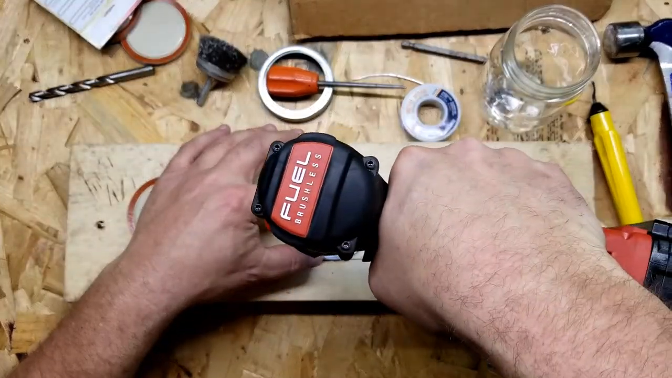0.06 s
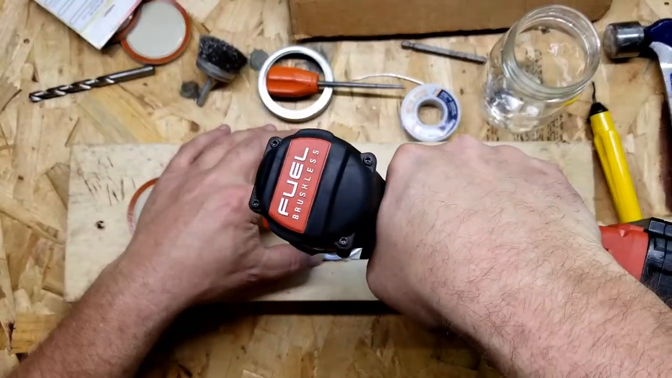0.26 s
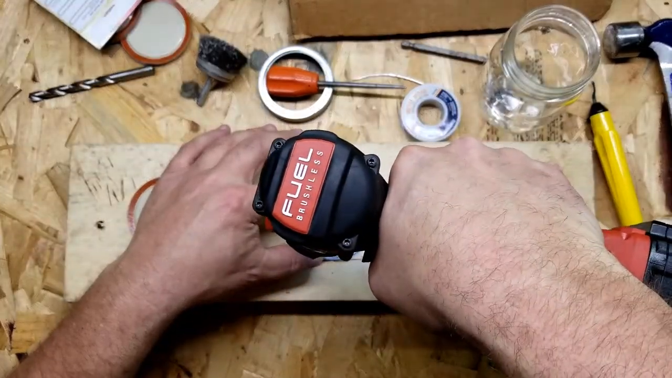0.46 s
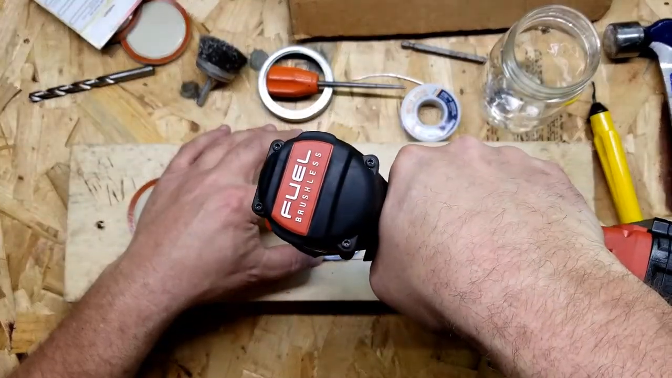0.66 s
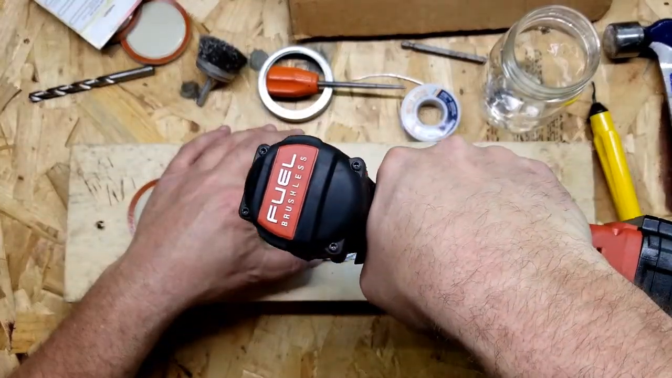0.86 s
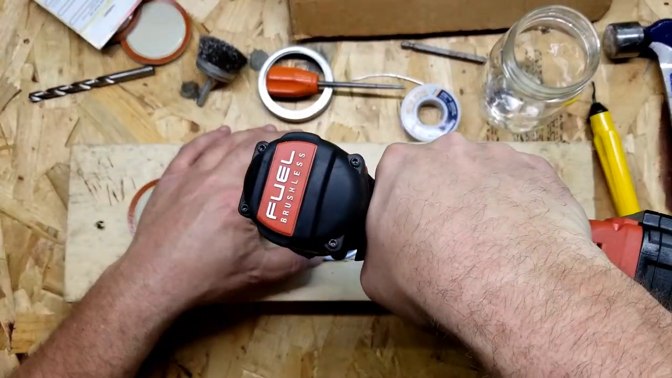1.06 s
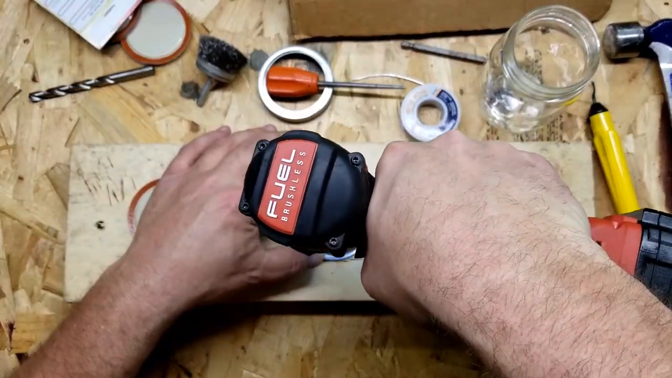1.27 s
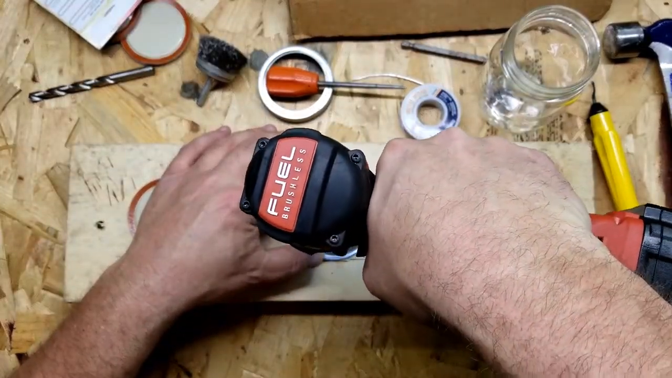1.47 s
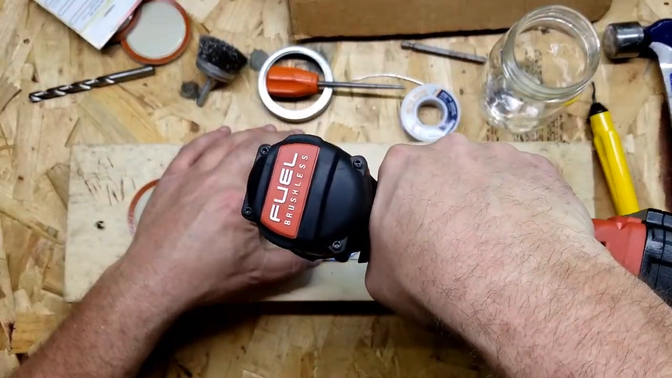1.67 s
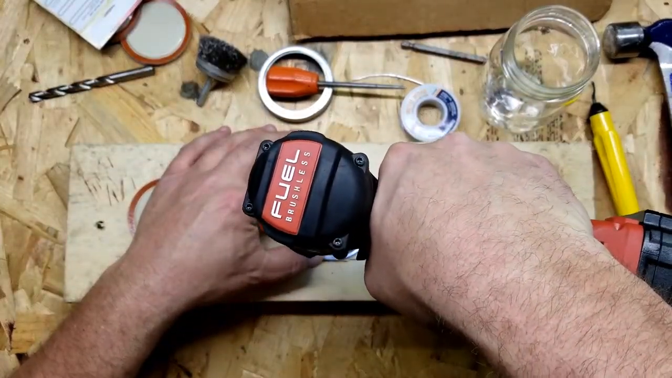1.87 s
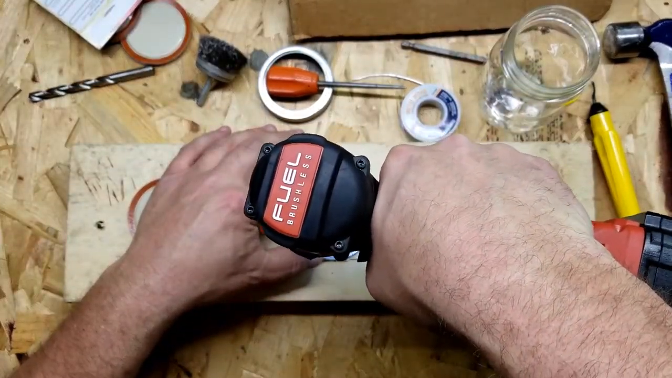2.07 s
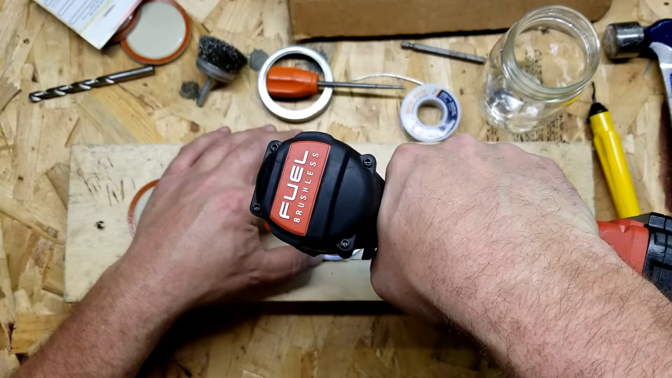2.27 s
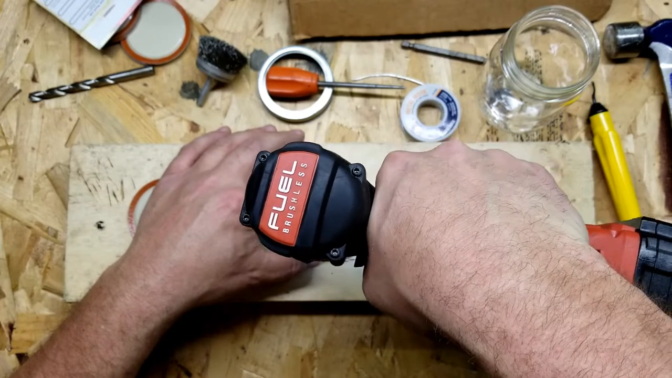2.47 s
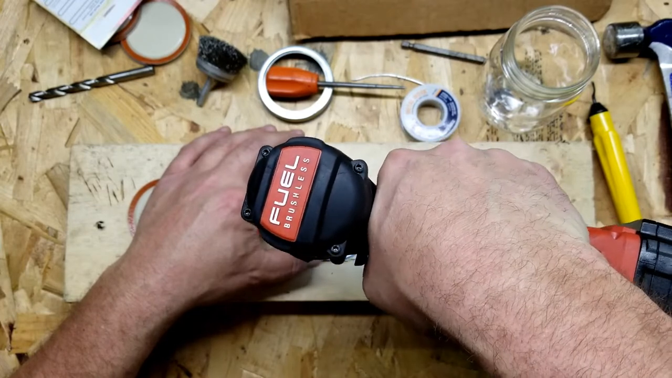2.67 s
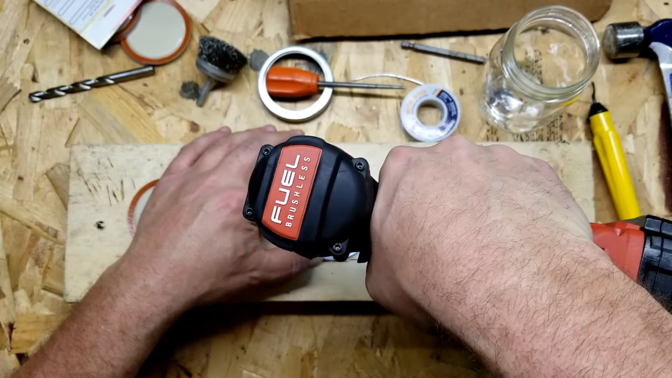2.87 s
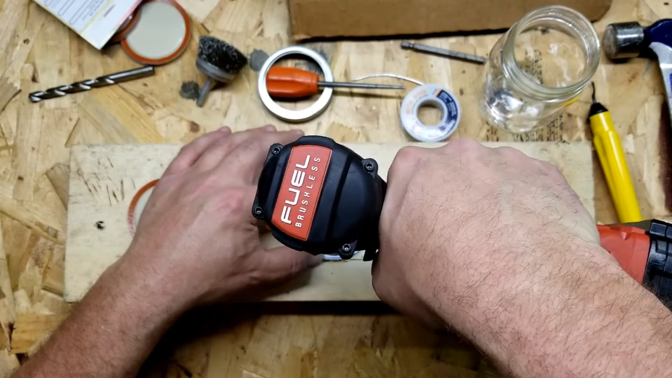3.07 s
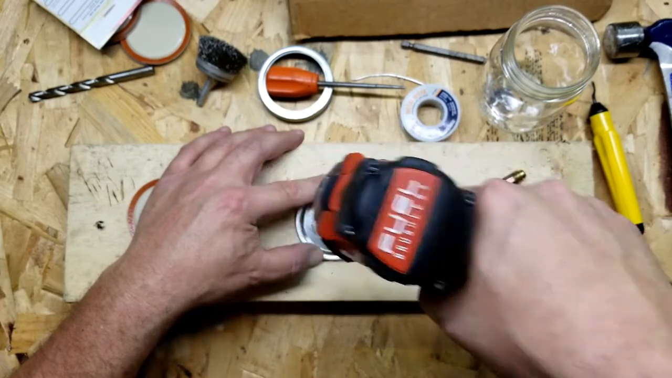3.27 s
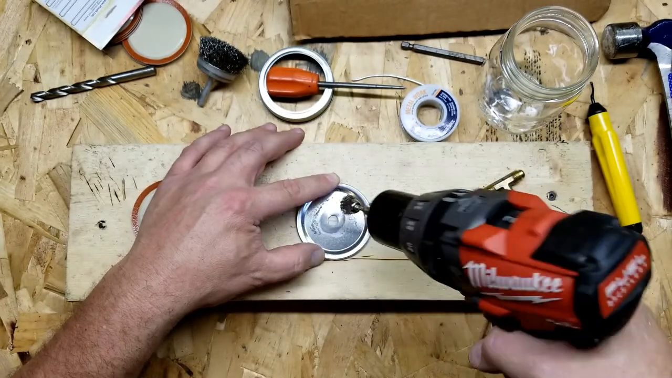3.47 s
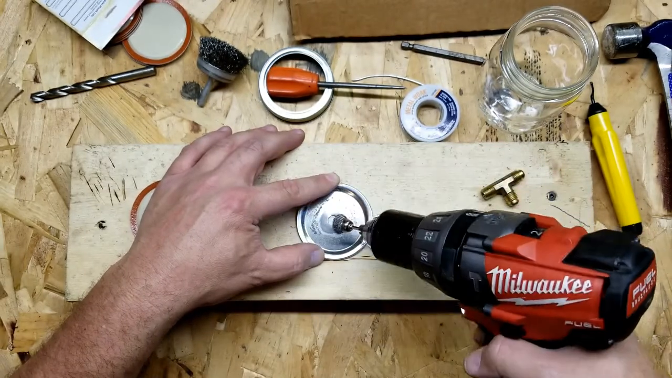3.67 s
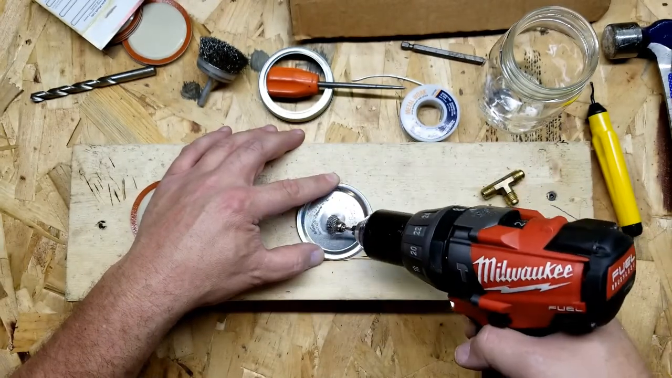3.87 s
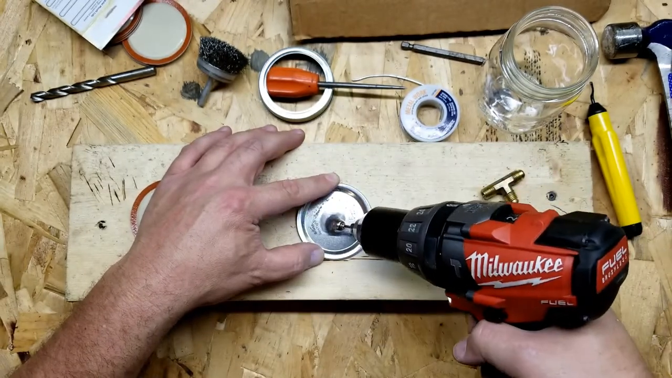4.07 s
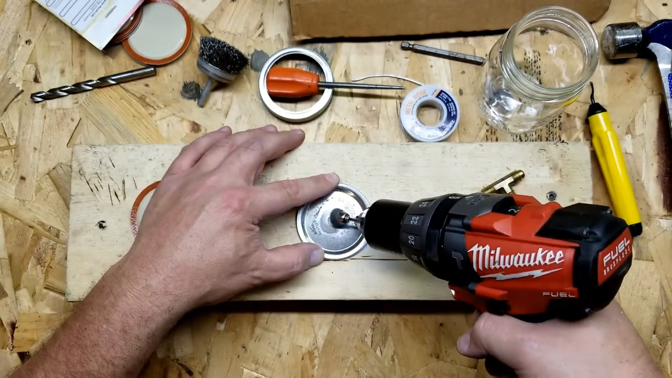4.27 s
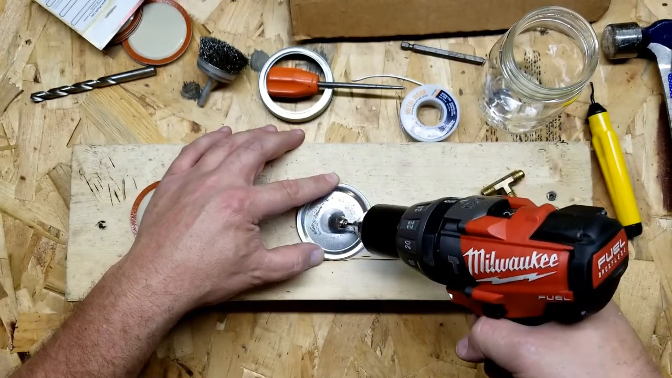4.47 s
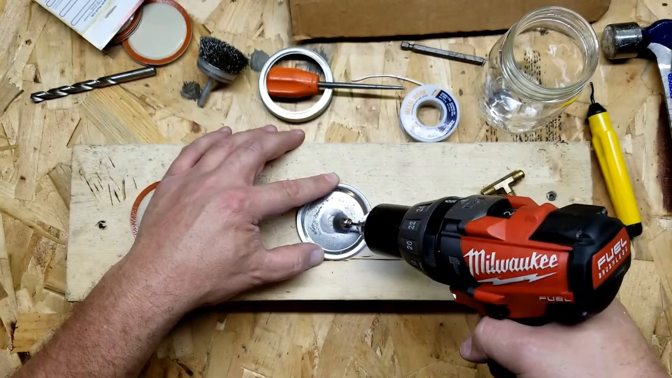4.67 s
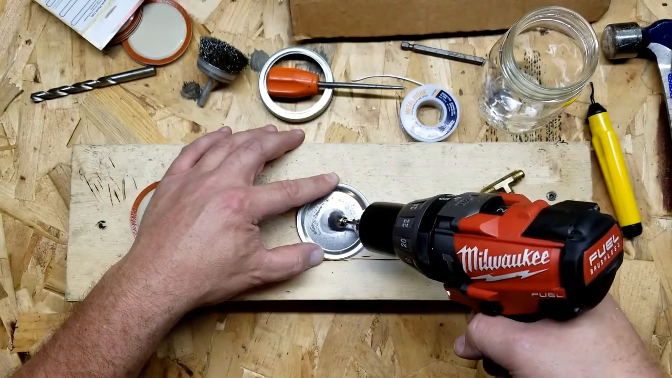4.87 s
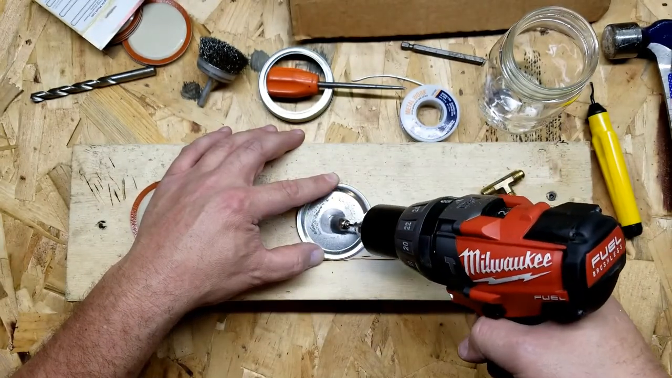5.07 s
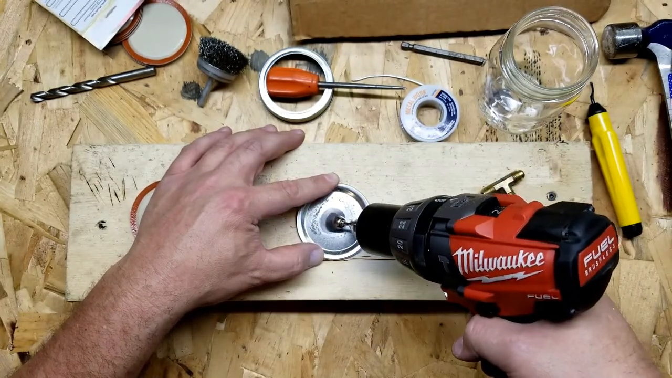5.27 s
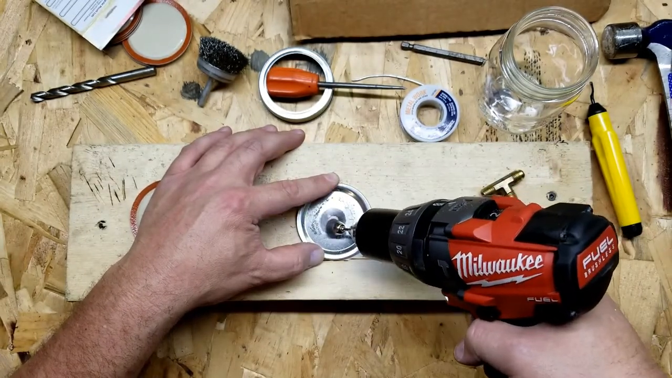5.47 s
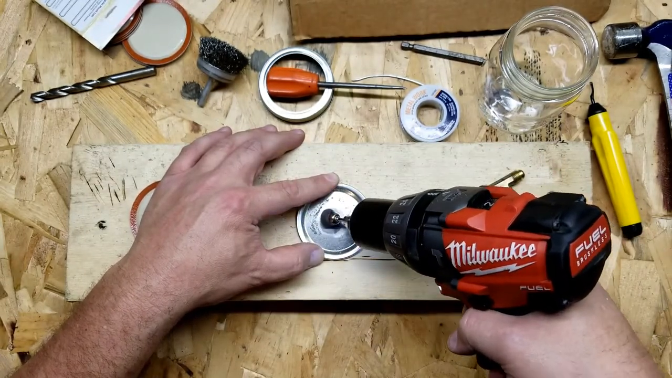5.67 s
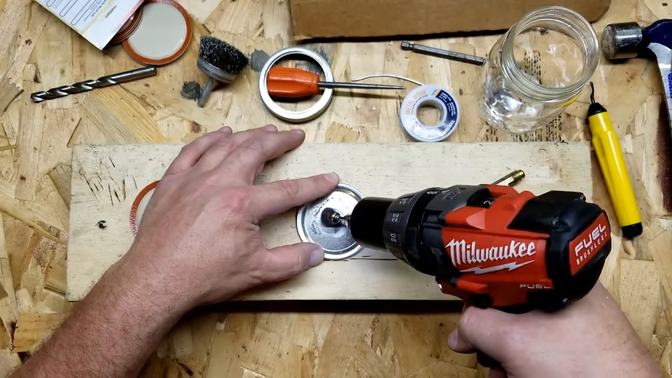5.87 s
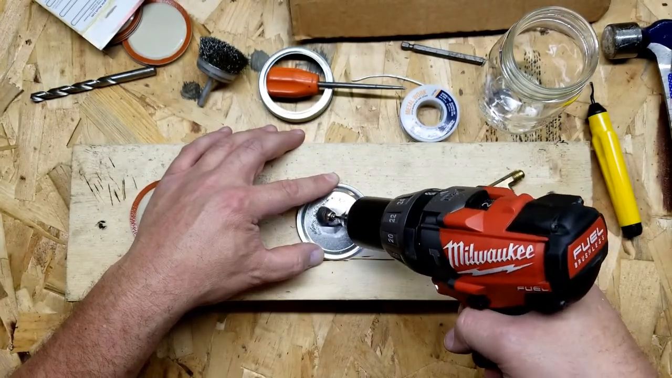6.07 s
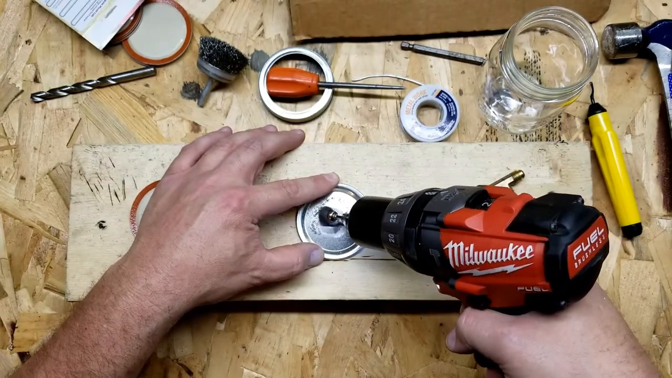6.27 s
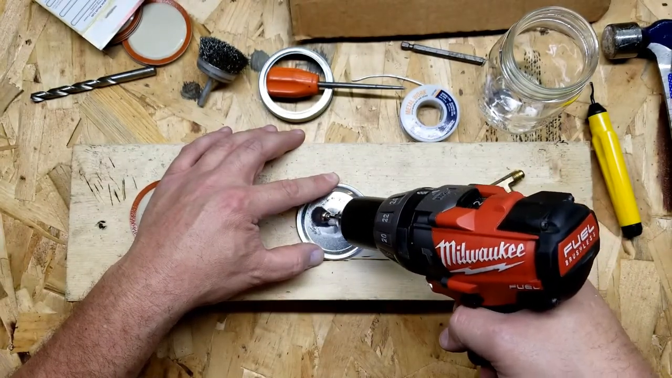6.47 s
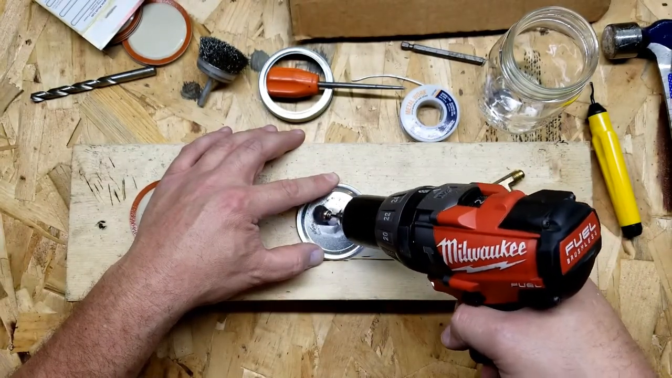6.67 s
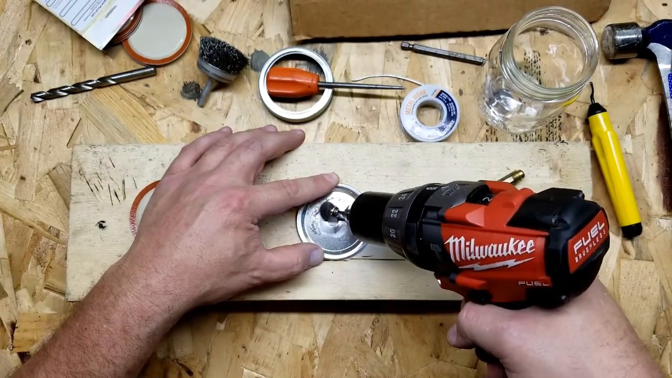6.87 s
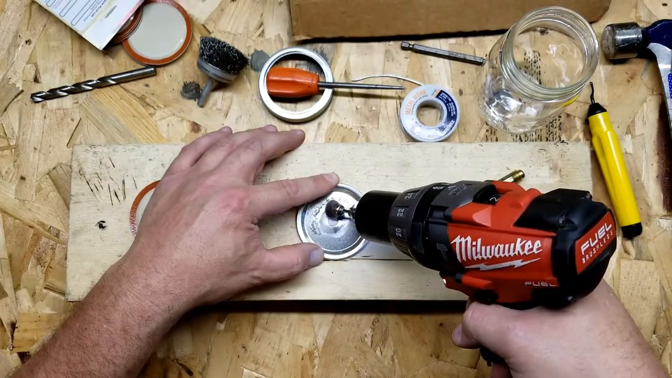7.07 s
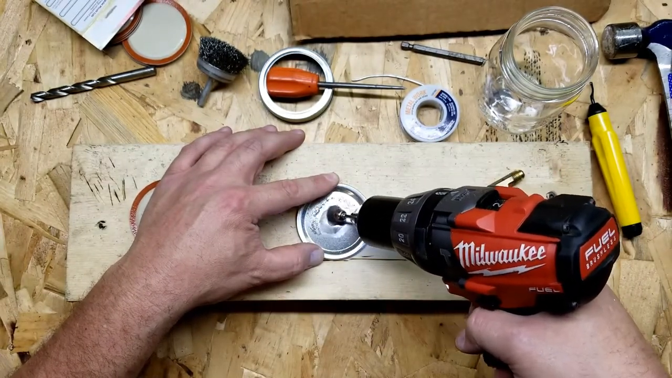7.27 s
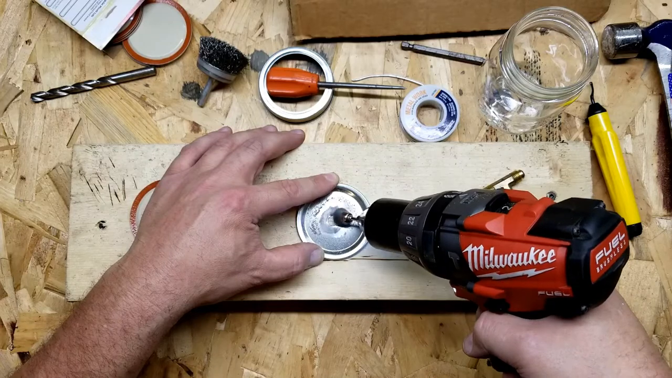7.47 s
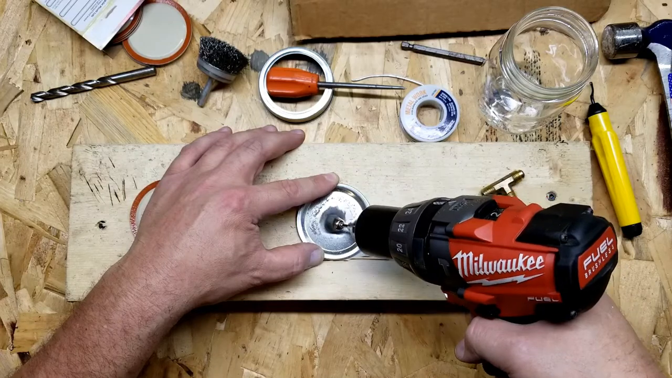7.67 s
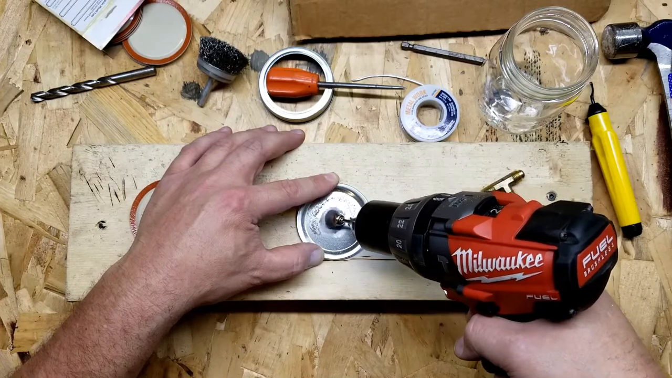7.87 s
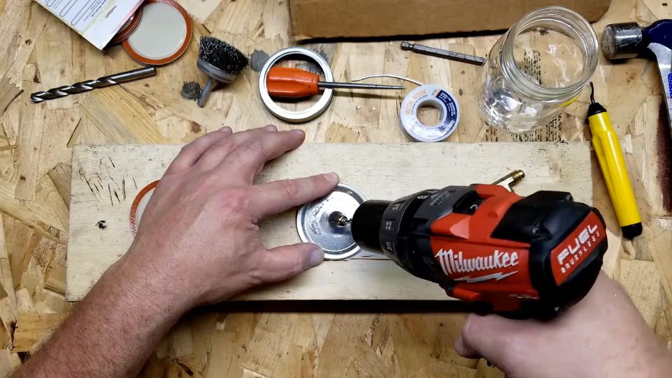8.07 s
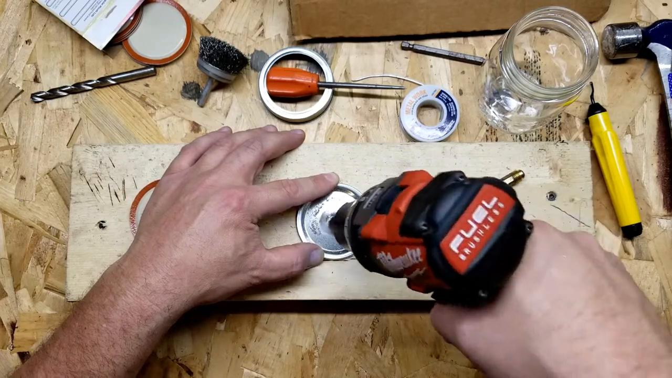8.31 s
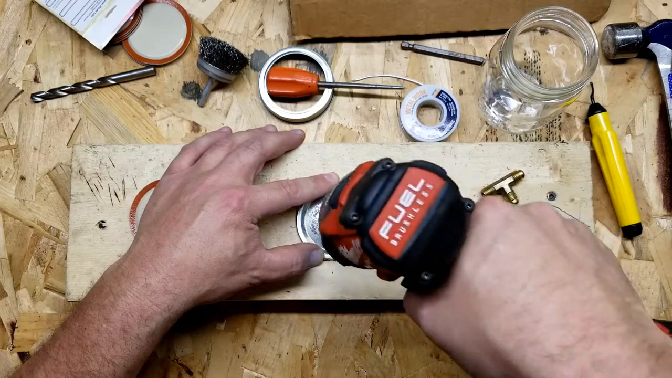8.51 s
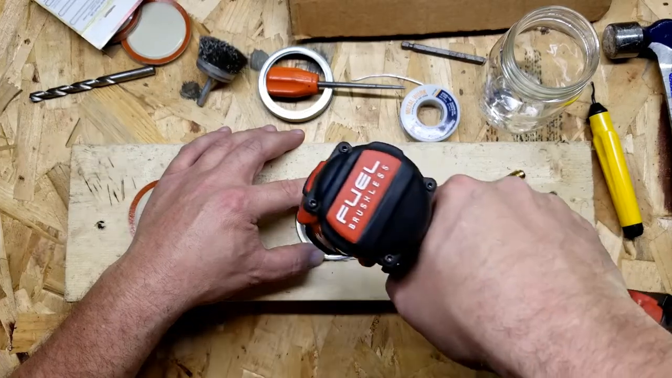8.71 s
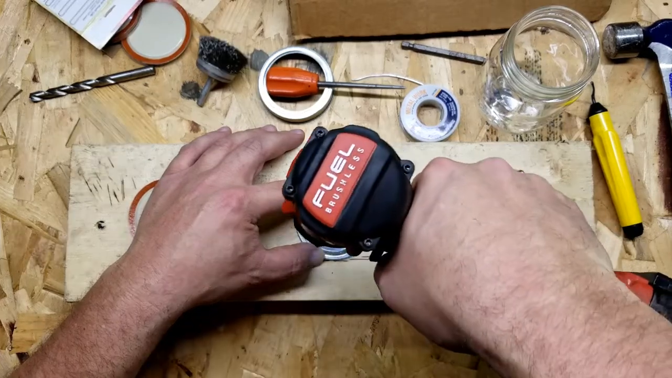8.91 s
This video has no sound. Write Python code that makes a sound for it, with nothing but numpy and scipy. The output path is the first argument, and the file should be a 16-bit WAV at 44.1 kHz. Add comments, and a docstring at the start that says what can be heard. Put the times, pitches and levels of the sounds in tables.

```python
"""A cordless drill spins a wire brush on a steel lid on a wooden bench, close to a pair of microphones.
In five stretches, gear tones and switching whine follow the motor speed over noise shaped as whirr and hiss;
the lid rings under bristle ticks and the bench hums at a resonance. Trigger clicks are damped plastic modes.
The second stretch is time-lapse: the drill played back about five times as fast and high, its speeds given
as played back. A short silence precedes it, a dip ends it; room tail and quiet background follow the dip."""
import sys
import numpy as np
from scipy import signal
from scipy.io import wavfile
from scipy.ndimage import uniform_filter1d

SR = 44100
rng = np.random.default_rng(int(sys.argv[2]) if len(sys.argv) > 2 else 0)


def master_out(mix):
    """Clip the mix to full scale and print it as 16-bit PCM to the path in sys.argv[1]."""
    frames = np.transpose(np.atleast_2d(mix))
    ceiling = np.clip(frames, -1, 1)
    pcm = np.round(ceiling * 32767).astype(np.int16)
    wavfile.write(sys.argv[1], SR, pcm)


N = 394342

# The drill's stretches. Each row: start and end in seconds, whirr level in dB, hiss in dB against the whirr,
# bench thrum in dB, attack in seconds, brake thump in dB. Pressure and speed move the levels.
STRETCHES = [(0, .735, -43, 3, -61, 0.00038, 3), (.79, 2.735, -52.5, 25, -59, 0.0037, 2),
             (2.75, 3.23, -35.5, 0, -53.5, 0.011, 3.5), (3.89, 8.1, -36, 4, -58, 0.013, 1),
             (8.578, 8.942, -38.5, 3.5, -68, 0.012, 0)]
# How alike the two microphones hear a sound. Each row: frequency in Hz, left-right likeness from 0 to 1.
LIKENESS = [(60, 0.91), (250, 0.91), (500, 1), (1000, 0.68), (2500, 1), (6000, 0.2), (15000, 0.48)]


def amp(db):
    """Amplitude factor of a level in dB."""
    return 10 ** (np.asarray(db) / 20)


def evened(x):
    """The signal scaled to rms 1."""
    return x / np.sqrt(np.mean(x ** 2) + 1e-20)


def read(points, hz):
    """Value of a spectrum at hz, on a log-frequency axis."""
    f, value = np.transpose(points)
    return np.interp(np.log(hz + 1), np.log(f + 1), value)


def add(mix, at, sound):
    """Lays a sound into the mix from sample at, cut off at the end of the mix."""
    part = mix[..., at:at + sound.shape[-1]]
    part += sound[..., :part.shape[-1]]


def ring(x, hz, width):
    """A fixed resonance, with a gain of about 1 at its peak and a width in Hz."""
    pole = np.exp((2j * np.pi * hz - np.pi * width) / SR)
    return 2 * signal.lfilter([1 - abs(pole)], [1, -pole], x).real


def wander(n, rate_hz):
    """Slow random drift of rms 1."""
    width = int(SR / rate_hz)
    return evened(uniform_filter1d(uniform_filter1d(rng.standard_normal(n), width), width))


def noise(n, colour, same, patchy_db, flicker_db):
    """Two channels of random short-time spectra with drifting patches and a shared flicker."""
    frames, hz = n // 256 + 5, np.fft.rfftfreq(1024, 1 / SR)
    a, b, c, d, patches = rng.standard_normal((frames, 513, 5)).T
    patches = evened(uniform_filter1d(uniform_filter1d(patches, 10, 0), 10, 1))
    left = a + 1j * b
    same = np.clip(same(hz), 0, 1)[:, None]
    right = same * left + np.sqrt(1 - same ** 2) * (c + 1j * d)
    z = np.array([left, right])
    z *= amp(colour(hz)[:, None] + patchy_db * patches + flicker_db * rng.standard_normal(frames))
    return signal.istft(z, nperseg=1024, noverlap=768)[1][:, :n]


def placed(pair, lag, pan_db):
    """The left microphone hears the sound lag samples later (earlier if negative) and pan_db louder."""
    return np.array([np.roll(pair[0], round(lag)) * amp(pan_db / 2), pair[1] * amp(-pan_db / 2)])


def wavering(turns):
    """A tone of about rms 1 whose level and phase drift a little, from its phase in turns."""
    level = amp(2.22 * wander(len(turns), 18))  # drift in dB
    drift = 0.19 * wander(len(turns), 30)  # radians
    return level * np.sqrt(2) * np.sin(2 * np.pi * (turns + rng.random()) + drift)


def quiet():
    """Background noise of the place, a steady two-channel spectrum."""
    # Each row: frequency in Hz, relative level in dB per Hz.
    quiet_colour = [(15, -62.5), (25, -19), (80, -7), (153, -34.5), (185, -18.5), (863, -25.5), (2000, -25),
                    (14000, -34), (16000, -42.5)]
    sound = noise(N, lambda hz: read(quiet_colour, hz), lambda hz: read(LIKENESS, hz), 2.0, 1.1)
    return amp(-72.5) * evened(sound)


def linger():
    """A faint narrow band of noise that swells and fades in the first pause; gives its start sample too."""
    start_s, length_s = 3.2, .58
    hz, width_hz, level_db = 1340, 155, -70
    shape = signal.windows.tukey(round(length_s * SR), .5)
    band = ring(ring(rng.standard_normal(SR), hz, width_hz), hz, width_hz)
    return round(start_s * SR), amp(level_db) * shape * evened(band)[:len(shape)]


def shop(x):
    """Sparse room taps of random sign, each band dying at its own speed, as alike left and right as its pitch."""
    # Each row: frequency in Hz, time to die by 60 dB in seconds.
    decay = [(125, 0.39), (500, 0.42), (1500, 0.51), (3000, 0.49), (6000, 0.54), (12000, 0.48)]
    taps = np.zeros((2, SR))
    at = np.arange(300, SR - 20, 20) + rng.integers(0, 20, (2, (SR - 301) // 20))
    np.put_along_axis(taps, at, rng.choice([-1., 1.], at.shape), 1)
    hz, t, z = signal.stft(taps, SR, nperseg=512)
    same = np.clip(read(LIKENESS, hz), 0, 1)[:, None] ** 2
    z[1] = same * z[0] + np.sqrt(1 - same ** 2) * z[1]
    fade = amp(-60 * t / read(decay, hz)[:, None])
    tail = signal.istft(z * fade, SR, nperseg=512)[1]
    return signal.fftconvolve(x, tail / np.linalg.norm(tail[0]), axes=1)[:, :N]


def clicks():
    """Plastic snaps: a short clatter with a weaker rebound rings the damped modes, over a low knock."""
    # Each row: start in seconds, snap peak in dB, knock in dB against the snap, left-right dB, rise in seconds.
    trigger_clicks = [(3.9, -31.5, -35, -7, 0.0011), (8.185, -38.5, -33, -8.5, 0.0076),
                      (8.39, -18, -30, -5.5, 0.003), (8.444, -18, -26.5, 4.5, 0.00044)]
    # Damped plastic modes. Each row: frequency in Hz, width in Hz, level in dB.
    plastic_modes = [(1240, 380, -10), (2340, 1360, 1.5), (4280, 250, 0), (5140, 480, 4),
                     (11000, 4000, -17)]
    out, t = np.zeros((2, N)), np.arange(4000) / SR
    for start_s, peak_db, knock_db, pan_db, rise_s in trigger_clicks:
        blow = amp(-60 * t / 0.016) + 0.16 * amp(-60 * t / 0.2)
        rebound = 0.16 * np.pad(blow, (330, 0))[:len(t)]
        blow = (blow + rebound) * np.minimum(t / rise_s, 1)
        snap = 0
        for hz, width_hz, db in plastic_modes:
            snap = snap + amp(db) * evened(ring(blow * rng.standard_normal(len(t)), hz, width_hz))
        knock = amp(knock_db - 60 * t / 0.03) * np.sin(2 * np.pi * 240 * t)
        snap = snap / abs(snap).max() + knock
        add(out, round(start_s * SR), amp(peak_db) * snap * amp([[pan_db / 2], [-pan_db / 2]]))
    return out


def lid():
    """Bristle tips tick on the steel in uneven clumps and ring its damped modes."""
    # Bristles bite the lid. Each row: start in seconds, length in seconds, level in dB.
    scrapes = [(0.117, 0.093, -28.5), (4.794, 0.16, -26), (5.506, 0.05, -17.5), (5.588, 0.11, -12.5),
               (5.669, 0.076, -11.5), (5.773, 0.069, -22.5), (5.934, 0.069, -22.5), (6.091, 0.028, -19),
               (6.127, 0.091, -15.5), (6.234, 0.051, -23.5), (7.606, 0.095, -23), (7.707, 0.17, -26.5),
               (7.808, 0.15, -23), (7.928, 0.073, -29)]
    # Modes of the steel. Each row: frequency in Hz, width in Hz, level in dB.
    lid_modes = [(1390, 190, -5.5), (4000, 270, -19), (5200, 180, -25), (5090, 50, 10), (5280, 690, 16),
                 (5470, 37, 2.5), (6520, 330, -13.5), (9700, 2200, 3)]
    bite = np.zeros(N)
    for start_s, length_s, db in scrapes:
        add(bite, round(start_s * SR), amp(db) * signal.windows.tukey(round(length_s * SR), .5))
    strength = amp(1.4 * np.minimum(rng.exponential(1, N), 4))
    ticks = strength * (rng.random(N) < 4000 / SR) * rng.choice([-1, 1], N)  # about 4000 a second
    ticks = bite * evened(ticks * amp(3 * wander(N, 150)))
    rung = []
    for hz, width_hz, db in lid_modes:
        evening = np.sqrt(SR / width_hz / (4 * np.pi))  # narrow modes would come out weaker
        rung.append(amp(db) * ring(ticks, hz, width_hz) * evening)
    # each mode radiates its own way: neighbours lean to opposite sides
    lean_db = [[1.5], [-1.5]] * np.cos(np.arange(len(lid_modes)) * np.pi)
    sides = amp(lean_db) @ np.array(rung)
    # a small lid radiates no bass
    sides = signal.sosfilt(signal.butter(2, 600, "high", fs=SR, output="sos"), sides)
    return placed(sides / np.linalg.norm(amp(np.transpose(lid_modes)[2])), 6.6, -5.0)


def bench(db, pace):
    """The board under the lid hums at one low resonance, raised by the playback pace, and comes and goes."""
    hz, width_hz = 141.4 * pace, 24 * pace
    flutter_db = 5.2 * wander(len(db), 9.7 * pace)
    hum = ring(ring(rng.standard_normal(len(db)), hz, width_hz), hz, width_hz)
    return amp(db + flutter_db) * evened(hum)


def whine(speed):
    """Switching tones with side tones that part from them as the motor speeds up."""
    switch_hz, slow_db = 4927.5, -53
    # Side tones, in orders of the motor speed from twice the switching rate.
    side_orders = [-8, -4, 0, 4, 8, 10, 14, 16]
    # Level of each side tone in dB, before the whine gain of the stretch.
    side_levels = [-63, -51, -61, -50, -55, -59, -60, -60]
    base, turns = switch_hz * np.arange(len(speed)) / SR, np.cumsum(speed) / SR
    out = 0
    for order, db in zip(side_orders, side_levels):
        out = out + amp(db) * wavering(2 * base + order * turns)
    # odd multiples are heard only while the motor turns slowly
    return out + amp(slow_db) * np.exp(-(speed / 90) ** 2) * (wavering(base) + wavering(3 * base))


def gears(index, speed, pace):
    """Orders of the motor speed, lifted as they pass the housing resonance; lash rattles as a low speed rises."""
    # Multiples of the motor speed as played back.
    gear_orders = [2, 4, 6, 8, 10, 12, 13, 16, 20, 22]
    # One row a stretch: level of each order in dB against the whirr.
    gear_levels = [(-26, -12.5, -15, -25, -17, -24, -.5, 8, 3, -25),
                   (-38, 11, -7, -20, 7, 0, -35, -35, -35, -35),
                   (-27, -7, -13, -9, -20, -14, -7, -4, -14, -25),
                   (-23, -18, -15, -26, -18, -20, -13, -9, -20, -15),
                   (-28, -14, -30, -25, -20, -26, -7, 2, -6, -25)]
    housing_hz, housing_width_hz, lift_db = 2900, 600, 9
    wobble, wobble_hz = .0003, 40  # random share of the speed and its rate, both raised by the pace
    shudder = .016  # share added per 1000 turns per s2
    torque_db = 3.5  # gears sing louder while the speed changes: gain at 1000 turns per s2 and above
    rattle_hz, rattle_width_hz, rattle_db = 2830, 150, 7  # against the whirr at 1000 turns per s2
    lash = .04  # rattle left at steady speed, in 1000 turns per s2

    # speed change in 1000 turns per s2, brought back from the playback pace
    change = uniform_filter1d(np.gradient(speed) * SR / 1000, 1500) / pace ** 2
    waver = (wobble * pace + shudder * abs(change)) * wander(len(speed), wobble_hz * pace)
    turns, out = np.cumsum(speed * (1 + waver)) / SR, 0
    for order, db in zip(gear_orders, gear_levels[index]):
        off_peak = 2 * (order * speed - housing_hz) / housing_width_hz
        out = out + amp(db + lift_db / (1 + off_peak ** 2)) * wavering(order * turns)
    if pace > 2:
        # thin tone of the time-lapse stretch, sinking as the played-back speed rises
        mirror_order, mirror_hz, mirror_db = 36, 57840, -46.5
        phase = mirror_hz * np.arange(len(speed)) / SR - mirror_order * turns
        out = out + amp(mirror_db - STRETCHES[index][2]) * wavering(phase)
    push = np.clip(change, 0, 1.5) * np.exp(-(speed / 200) ** 4) + lash * (pace < 2)
    band = evened(ring(rng.standard_normal(len(speed)), rattle_hz, rattle_width_hz))
    tones = out * amp(torque_db * np.minimum(abs(change), 1) ** .5)
    return tones, amp(rattle_db) * np.sqrt(push) * band


def motor(index):
    """Time, speed as played back, easing towards each trigger setting, and time since the brake took hold."""
    # Motor speed as played back when each stretch begins, in turns per second;
    # the second is time-lapse, where the motor itself turned several times slower.
    start_turns = [145, 1190, 271, 15, 10]
    # Speed settings. Each row: start in seconds, aim in turns per second as played back (0 is the brake),
    # time constant in seconds.
    speed_settings = [(0, 171.7, .095), (.79, 1237, .045), (1.1, 1244, .35), (1.9, 1250, .1),
                      (2.1, 1243, .15), (2.75, 270, .1), (3.065, 235, .07), (3.125, 0, .095),
                      (3.89, 15, .1), (3.915, 215, .07), (4.18, 252.5, .08), (5.2, 253.8, 1.),
                      (7.96, 215, .05), (8.005, 0, .07), (8.578, 50, .03), (8.628, 207, .05),
                      (8.835, 233, .05)]
    start, end = STRETCHES[index][:2]
    t = np.arange(round(start * SR), min(round(end * SR), N)) / SR
    speed = np.full(len(t), float(start_turns[index]))
    since = np.full(len(t), -1.)  # stays at -1 where no brake comes
    for s, aim, ease_s in speed_settings:
        if t[0] - .005 < s < t[-1]:
            now = np.interp(s, t, speed)
            eased = aim + (now - aim) * np.exp(-np.maximum(t - s, 0) / ease_s)
            speed = np.where(t < s, speed, eased)
            since = t - s if aim == 0 else since
    return t, speed, since


def drill(index):
    """Whirr of gears and bristles with hiss, gears, whine and thrum; playback pace scales some pitches and lags."""
    # Spectra of the first, the time-lapse and the later stretches, as played back.
    # Each row: frequency in Hz, relative level in dB per Hz.
    whirr_colours = [
        [(15, -70.5), (25, -44), (516, -34.5), (796, -21), (1290, -26), (2160, -19), (2410, -20.5),
         (2690, -12.5), (3080, -17.5), (16000, -22)],
        [(15, -58), (25, -45.5), (53, -39), (503, -28), (677, -19.5), (840, -33.5), (1230, -14), (2610, -14.5),
         (3620, -2.5), (4610, -8), (5140, -7.5), (5880, -9.5), (7510, 0), (14800, 0), (16000, -3.5)],
        [(120, -39), (200, -32.5), (300, -14.5), (400, -18.5), (500, -16), (883, -7), (1100, -10), (1500, -3.5),
         (2380, -6.5), (2750, -2), (4120, 0.5), (8420, -10), (12200, 0.5), (16000, -8)],
    ]
    # Place before the microphones. One row a stretch: which whirr, playback pace as a factor,
    # left lag in samples (at pace 1), left-right dB, the same for the hiss, likeness exponent, whine gain in dB.
    places = [(0, 1, -3, -3, -3, 1.9, 4), (1, 4.61, -4, -0.5, -0.4, 0.09, -28.5),
              (2, 1, -4, -.8, -2, 0.68, -3), (2, 1, 6, -1, -6, 1.1, -2), (2, 0.834, 3, -1, -2.5, 1.1, -3)]
    # How hard the brush is pressed down. Each row: time in seconds, gain of the whirr in dB.
    pressure = [(0, 1), (.11, 0.5), (.735, 0.5), (.79, -0.5), (2.5, -0.5), (2.735, 0), (2.75, -0.5),
                (3.2, 0), (3.9, 0), (4.5, 1), (5.0, 1), (5.7, 1), (5.8, .5), (6.3, -1.5), (6.42, -3),
                (7.2, -1.5), (7.7, -1), (8.0, -1.5), (8.6, 0), (8.94, 1)]
    hiss_share, thrum_share, rumble_share, tone_share = 1.7, 4.5, 3.9, -1.1  # extra dB per dB of pressure
    # rise in dB for a tenfold speed; the tones' is against the whirr
    whirr_decade_db, thrum_decade_db, tone_decade_db = 19.5, 7, 16
    thump_s, coast_s, fade_db_per_s = .016, .042, 480  # brake: time of thump peak, coast, fade
    lift_s, lift_db = 0.068, -9  # the brush lifts just before the brake: the hiss sinks

    t, speed, since = motor(index)
    n = len(speed)
    _, _, whirr_db, hiss_db, thrum_db, attack_s, thump_db = STRETCHES[index]
    which, pace, lag, pan_db, hiss_pan_db, spread, whine_db = places[index]

    press = np.interp(t, *np.transpose(pressure))
    decades = np.log10(speed / speed.max())
    u = np.maximum(since, 0) / thump_s
    attack_db = 40 * np.log10(np.clip((t - t[0]) / attack_s, .01, 1))
    fade_db = attack_db - fade_db_per_s * np.maximum(since - coast_s, 0)
    whirr_db = whirr_db + press + whirr_decade_db * decades + thump_db * u * np.exp(1 - u) + fade_db
    hiss_db = hiss_db + hiss_share * press + lift_db * np.clip(1 + since / lift_s, 0, 1)
    thrum_db = thrum_db + thrum_share * press + thrum_decade_db * decades + fade_db
    tone_db = tone_share * press + tone_decade_db * decades

    whirr = noise(n, lambda hz: read(whirr_colours[which], hz),
                  lambda hz: read(LIKENESS, hz / pace) ** spread, 1.83, 0.52)
    low = signal.sosfiltfilt(signal.butter(4, 6800, fs=SR, output="sos"), whirr)
    high = whirr - low
    # the whirr level refers to the band from 800 to 2000 Hz
    reference = signal.butter(4, (800, 2000), "band", fs=SR, output="sos")
    band = signal.sosfiltfilt(reference, low.mean(0))

    # the hand passes a low shake to the bench, 30 dB under the whirr before pressure
    shake = evened(ring(rng.standard_normal(n), 61 * pace, 75 * pace))
    rumble = amp(-30 + rumble_share * press) * shake
    body = amp(whirr_db) * (low / band.std() + rumble)
    treble = amp(whirr_db + hiss_db) * high / high.mean(0).std()
    tones, rattle = gears(index, speed, pace)
    tones = amp(whirr_db) * (amp(tone_db) * tones + rattle)
    tones = tones + amp(whine_db + fade_db) * whine(speed)

    both = placed(body, lag / pace, pan_db) + placed(treble, lag / pace, hiss_pan_db)
    both += placed([tones, tones], 0, pan_db)  # the motor is equally far from both microphones
    both += bench(thrum_db, pace)
    return round(t[0] * SR), both * signal.windows.tukey(n, 400 / n)


def scene():
    """All layers at their places; room tail and quiet background are heard only after the last dip."""
    # Silence and dip. Each row: time the sound drops in seconds, time it starts to return in seconds
    # (if earlier, it falls at once to nothing there), fade-in in seconds.
    silences = [(0.738, 0.791, 0.0067), (2.731, 2.725, 0.0082)]
    mix = clicks() + lid()
    for index in range(len(STRETCHES)):
        add(mix, *drill(index))
    add(mix, *linger())
    t = np.arange(N) / SR
    after = t > silences[-1][0]
    mix += amp(-10.5) * shop(mix * after)
    mix += after * quiet()
    for start, end, rise_s in silences:
        dying = .12 * amp(-60 * (t - start) / .025)
        before_end = np.where(t < start, 1, dying)
        mix *= np.where(t < end, before_end, np.minimum((t - end) / rise_s, 1) ** 2)
    return mix


def record(dry):
    """A steep low-pass limits the band to 15850 Hz."""
    taps = signal.firwin(511, 15850, window=("kaiser", 9), fs=SR)
    return signal.oaconvolve(dry, taps[None], "same")


dry = scene()
out = record(dry)
master_out(out)
```